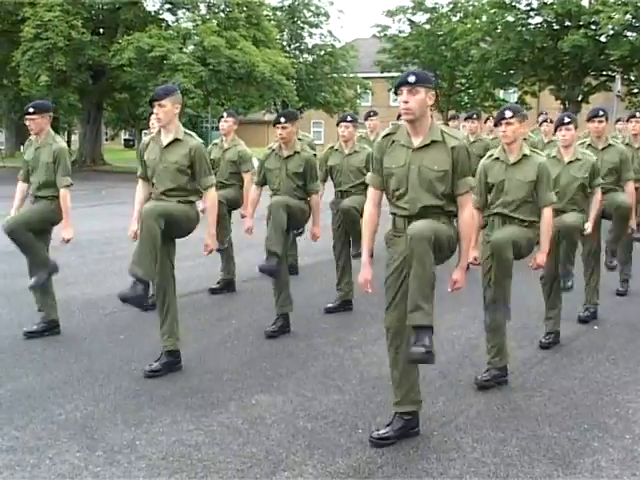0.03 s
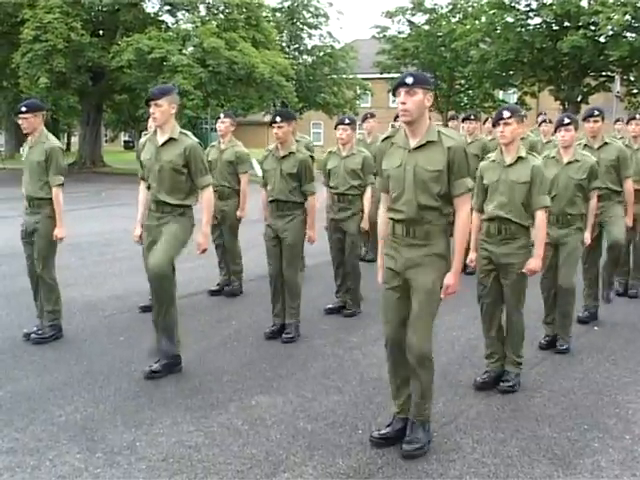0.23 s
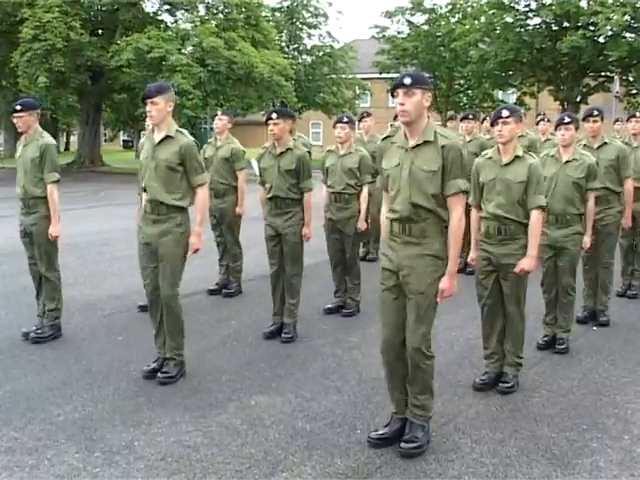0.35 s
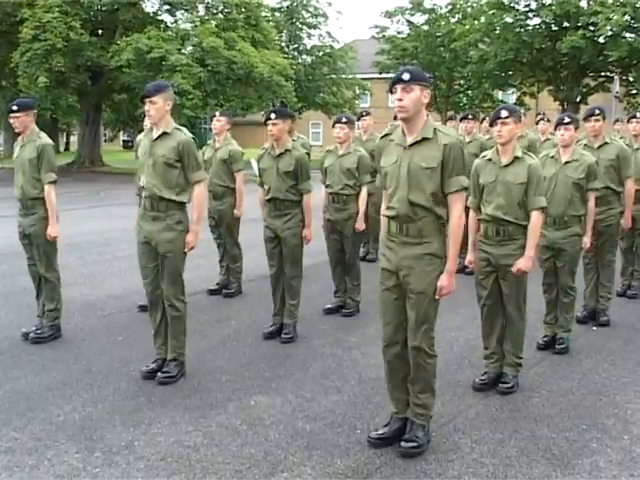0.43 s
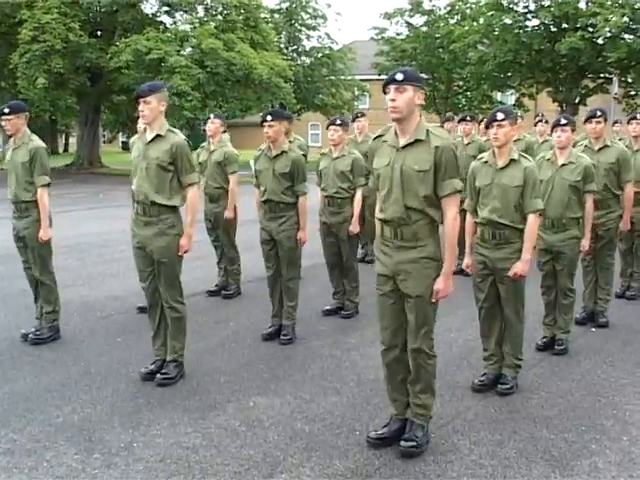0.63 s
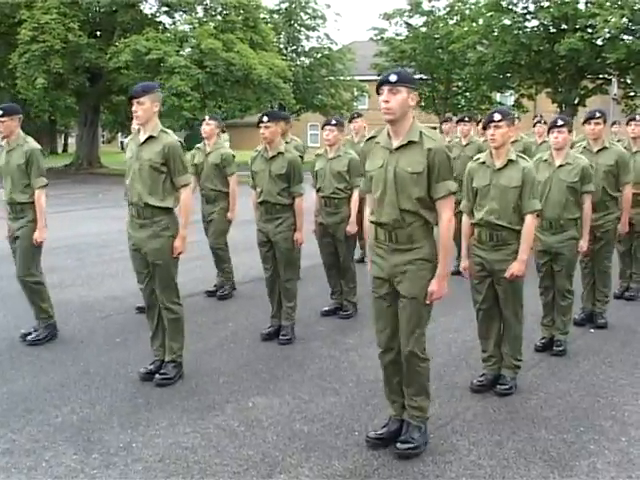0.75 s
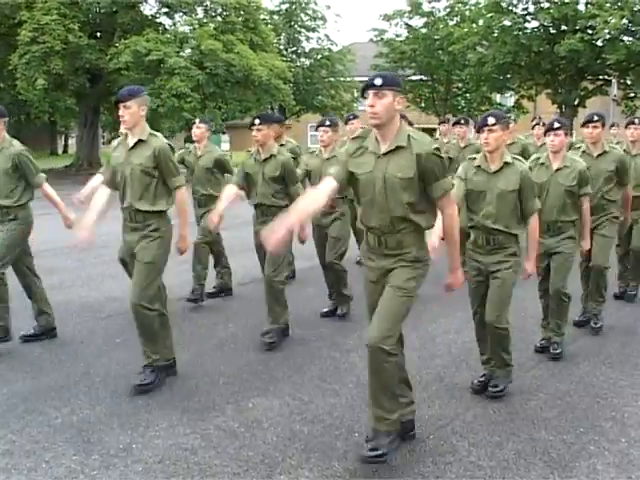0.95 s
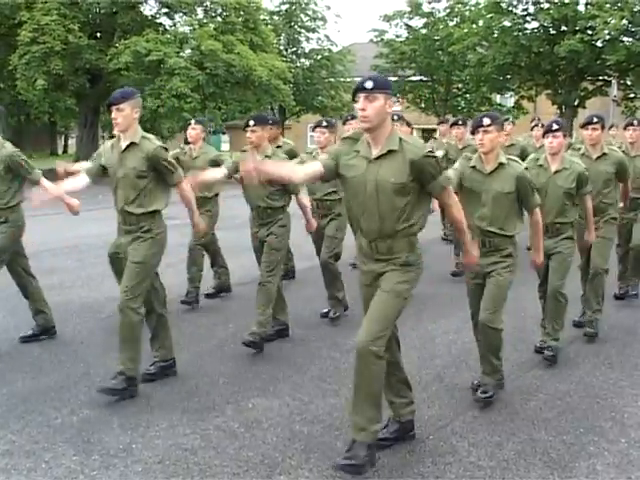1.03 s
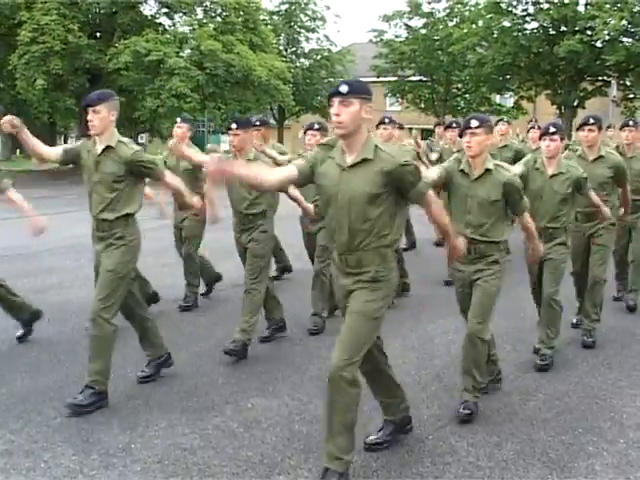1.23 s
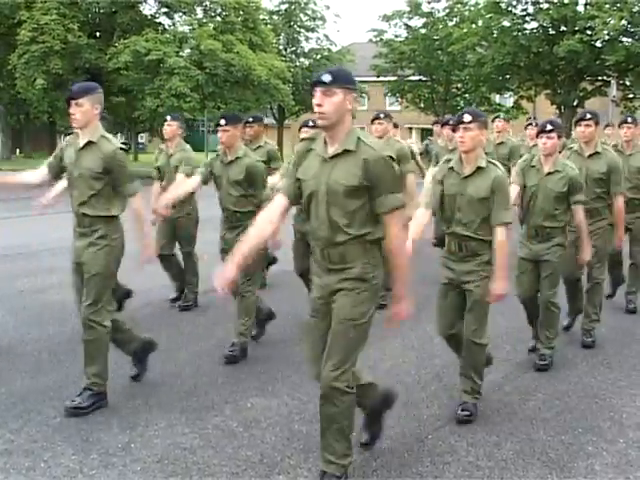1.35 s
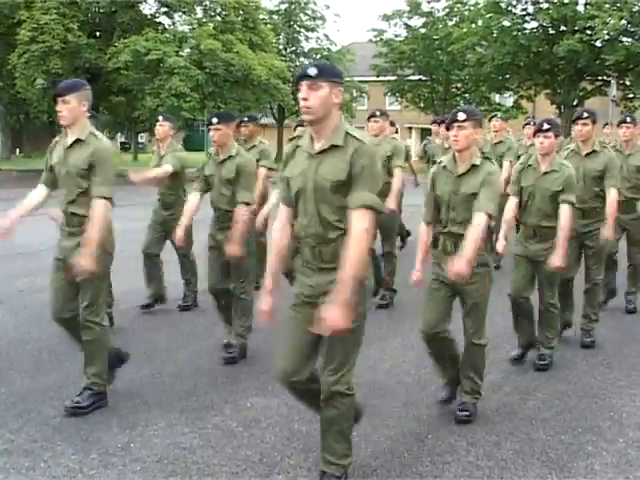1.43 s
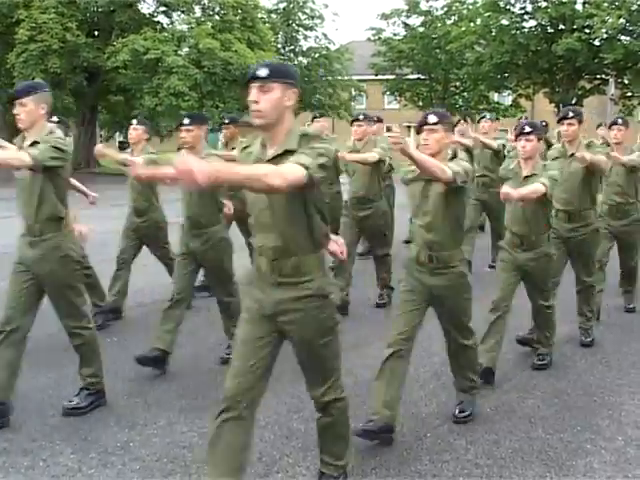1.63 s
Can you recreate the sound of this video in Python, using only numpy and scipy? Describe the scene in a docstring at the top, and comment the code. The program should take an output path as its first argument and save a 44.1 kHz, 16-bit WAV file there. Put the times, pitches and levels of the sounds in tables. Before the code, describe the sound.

A squad of soldiers stamps down almost together on an open square, a loud gritty clatter heard close by and louder on the left. They pause, then march off with faint steps, scuffs and uniform rustle over a light wind rumble.

```python
"""A squad of soldiers on an open tarmac square, heard from beside the front ranks, louder on the left.
Light wind rumbles on the microphone and uniforms rustle. The men stamp to attention in one ragged
volley, each boot a hollow clap with a crunch of grit; buildings and trees send back a dull echo.
They stand still for a moment, then march off with soft steps, scuffing soles and rustling cloth."""
import sys
import numpy as np
from scipy import signal
from scipy.fft import rfft, irfft
from scipy.io import wavfile

SR = 44100
rng = np.random.default_rng(int(sys.argv[2]) if len(sys.argv) > 2 else 0)


def master(y):
    """Save y as 16-bit WAV."""
    cut = np.clip(np.atleast_2d(y).T, -1, 1)
    pcm = np.round(cut * 32767)  # scale
    wavfile.write(sys.argv[1], SR, pcm.astype(np.int16))


N = 74970
TIME = np.arange(N) / SR
STAMP_CRUNCH_S, STEP_CRUNCH_S = 0.0017, 0.0018  # stamps and steps each give a brief crunch of grit


def amp(db):
    """Decibels to gain."""
    return 10 ** (np.asarray(db) / 20)


def unit(x):
    """Scales to rms 1."""
    return x / np.sqrt(np.mean(x ** 2) + 1e-20)


def read(points, hz):
    """Reads a table along a log-frequency axis."""
    f, value = np.transpose(points)
    return np.interp(np.log(hz + 1), np.log(f + 1), value)


def add(mix, start_s, sound):
    """Mixes a sound in at the given time."""
    part = mix[max(round(start_s * SR), 0):][:len(sound)]
    part += sound[:len(part)]


def butter(x, hz, kind, order=2):
    """Butterworth low-pass or high-pass."""
    return signal.sosfilt(signal.butter(order, hz, kind, fs=SR, output="sos"), x)


def resonate(x, hz, q):
    """Two passes through one resonance."""
    peak = signal.iirpeak(hz, q, SR)
    return signal.lfilter(*peak, signal.lfilter(*peak, x))


def colour(x, points, size=2048):
    """Causal filter of unit energy with the given spectrum."""
    log_gain = np.log(amp(read(points, abs(np.fft.fftfreq(size, 1 / SR)))))
    taps = np.fft.ifft(np.exp(np.conj(signal.hilbert(log_gain)))).real
    return signal.fftconvolve(x, taps / np.linalg.norm(taps))[:len(x)]


def wander(rate_hz):
    """Smooth random drift of rms 1, up to the given rate."""
    hz = np.fft.rfftfreq(N, 1 / SR)
    return unit(irfft(rfft(rng.standard_normal(N)) / (1 + (hz / rate_hz) ** 4), N))


def gravel(size, spread_db):
    """Dense tiny fractures of uneven size, rms 1."""
    return unit(rng.standard_normal(size) * amp(spread_db * np.minimum(rng.exponential(1, size), 3)))


def wind():
    """Light wind on the microphone: a lumpy low rumble with a trace of outdoor hiss."""
    # strength of the wind (time [s], level [dB])
    gusts = [(0, -44), (.06, -54), (.18, -54), (.55, -51), (0.679, -54.5), (.85, -51), (1.0, -53.5),
             (1.2, -48.5), (1.45, -55.5), (1.7, -53)]
    # spectrum of the rumble (frequency [Hz], level [dB])
    spectrum = [(20, -11), (52, -6), (90, 0), (135, 3), (200, -3.5), (400, -10), (800, -29.5),
                (2000, -27.5), (6000, -39.5), (16000, -57)]
    level = np.interp(TIME, *np.transpose(gusts))
    rumble = colour(rng.standard_normal(N), spectrum)
    return amp(level) * unit(rumble * amp(1.5 * wander(rate_hz=25)))


def uniforms():
    """Grainy friction of cloth, faintest while the men stand still."""
    # rustle as legs and arms swing (time [s], level [dB])
    rustle = [(0, -52.5), (.09, -56.5), (0.181, -58.5), (.45, -58), (0.599, -65.5), (.76, -68),
              (.84, -59.5), (.92, -55.5), (1.08, -57), (1.2, -58.5), (1.33, -59), (1.42, -55), (1.5, -54),
              (1.59, -53.5), (1.7, -56.5)]
    # spectrum of the cloth (frequency [Hz], level [dB])
    cloth = [(150, -2), (500, 8.5), (1000, 3), (2000, -3), (4000, -8.5), (7000, -14), (11000, -14),
             (13000, -17), (16000, -34)]
    level = np.interp(TIME, *np.transpose(rustle))
    rubbing = rng.standard_normal(N) * amp(wander(rate_hz=250))
    return amp(level) * unit(colour(rubbing, cloth))


def boots(rows, crunch_s):
    """Each sole claps the air out from under it, thuds, and crunches grit at a pitch of its own."""
    # spectrum of the broad part of the grit (frequency [Hz], level [dB])
    grit_spectrum = [(200, -34), (700, 28), (1400, 15), (2400, -1), (3600, 6.5), (5000, -14), (7000, -12),
                     (11000, -7), (13500, -18), (16000, -42)]
    grit_rise_s, settle_s = 0.00089, 0.014
    thud_hz, thud_s = 94.2, 0.0064  # the weight of the leg behind the sole
    peak_cycles, snap_cycles = 0.51, 0.34
    blows, broad_grit = np.zeros((2, N))
    t = np.arange(SR // 12) / SR
    crunch = (1 - np.exp(-t / grit_rise_s)) * (np.exp(-t / crunch_s) + amp(-28) * np.exp(-t / settle_s))
    thud = amp(-20.5) * t / thud_s * np.exp(1 - t / thud_s) * np.sin(2 * np.pi * thud_hz * t)
    for start, clap_db, clap_hz, grit_db, grit_hz in rows:
        cycles = t * clap_hz
        # the clap starts sharp and sinks as the sole closes on the ground
        turns = 0.67 * cycles + 0.46 * (1 - np.exp(-cycles / snap_cycles))
        swell = cycles / peak_cycles
        clap = (swell * np.exp(1 - swell)) ** 2.18 * np.sin(2 * np.pi * turns)
        add(blows, start, amp(clap_db) * (thud - clap))
        grains = gravel(len(t), spread_db=3.5)
        add(blows, start, amp(grit_db) * crunch * unit(resonate(grains, grit_hz, q=2.11)))
        add(broad_grit, start, amp(grit_db - 1.5) * crunch * grains)
    return butter(blows + colour(broad_grit, grit_spectrum), 117.4, "high")


def steps():
    """Soft footfalls crunch briefly on the grit: one before the volley, the rest as the men march off."""
    # footfalls (time [s], clap level [dB], nominal clap pitch [Hz], grit level [dB], grit pitch [Hz])
    footfalls = [(.0410, -35.5, 710, -55, 754), (.9025, -36, 213, -40.5, 1950),
                 (1.0055, -55, 397, -40.5, 1590), (1.1625, -33.5, 170, -55, 2960),
                 (1.1700, -36, 222, -50, 3700), (1.2260, -37.5, 314, -47, 4050),
                 (1.2342, -33, 344, -42.5, 2140), (1.2515, -31, 223, -59, 2500),
                 (1.2590, -39.5, 340, -74, 2500), (1.2672, -38, 270, -66, 2500),
                 (1.2862, -29, 236, -67, 900), (1.2930, -32, 286, -70, 3000), (1.4085, -38, 108, -70, 3130)]
    return boots(footfalls, STEP_CRUNCH_S)


def front_ranks():
    """The boots nearest the microphone stamp down in a ragged volley."""
    # stamps (time [s], clap level [dB], nominal clap pitch [Hz], grit level [dB], grit pitch [Hz])
    stamps = [(.2157, -14, 306, -36, 1480), (.2366, -10.5, 354, -25, 1380), (.2402, -12.5, 247, -21.5, 860),
              (.2560, -33, 177, -33, 2250), (.2670, -10, 340, -23.5, 2270), (.2762, -17.5, 335, -34, 3600),
              (.2825, -17.5, 378, -47, 1730), (.2915, -15, 320, -54, 4080), (.2991, -7, 598, -30, 1870),
              (.3009, -6.5, 335, -19.5, 880), (.3079, -4, 212, -25, 1580), (.3128, -9, 265, -28, 2600),
              (.3225, -14.5, 417, -48, 2060), (.3337, -15.5, 444, -48, 3800),
              (.3395, -12.5, 231, -30, 1470), (.3466, -8, 438, -29.5, 2150), (.3522, -12, 149, -49, 2760),
              (.3625, -14.5, 706, -19.5, 1330), (.3674, -15, 290, -49, 2420),
              (.3721, -11.5, 373, -29.5, 1660), (.3745, -14, 215, -32.5, 3400),
              (.3838, -17, 211, -39.5, 3450), (.3893, -20.5, 226, -33, 3620), (.4177, -24, 348, -40, 2330),
              (.4258, -20.5, 310, -29, 1600), (.4332, -24, 189, -58, 3000), (.4430, -30, 250, -55, 2320),
              (.4494, -20, 222, -63, 3000), (.4632, -22, 396, -36.5, 1880), (.4760, -42, 414, -44.5, 2670),
              (.4870, -33.5, 487, -44, 3400)]
    return boots(stamps, STAMP_CRUNCH_S)


def heel_cracks():
    """Hard heel edges crack against stones in the tarmac: a brief rattle of fracture, rung by the stone."""
    # heel strikes (time [s], level [dB], pitch [Hz])
    strikes = [(0.216, -45.5, 9000), (0.226, -37, 3020), (0.236, -44.5, 5950), (.2670, -23, 2020),
               (0.298, -33, 4030), (0.3477, -32.5, 5270), (0.3807, -53, 7000), (.4258, -27, 2030),
               (0.4443, -37.5, 3500), (0.5004, -36.5, 3080), (0.5718, -53, 4030), (.8880, -44, 4400),
               (1.2863, -43, 806)]
    decay_s = 0.0009
    out, t = np.zeros(N), np.arange(SR // 60) / SR
    for start, db, hz in strikes:
        rattle = rng.standard_normal(len(t)) * np.exp(-t / decay_s)
        top_hz = min(2.03 * hz, SR / 3)  # above this a stone radiates little
        ring = butter(resonate(rattle, hz, q=0.73), top_hz, "low", order=4)
        add(out, start, amp(db) * ring / abs(ring).max())
    return out


def grinding():
    """All the soles grind loose grit, joining the separate blows into one crunch that trails off."""
    # grit ground under the whole squad (time [s], level [dB])
    grind = [(.22, -58), (.265, -45), (.31, -41.5), (.38, -47.5), (.42, -52), (.48, -54.5), (.52, -60.5),
             (.58, -84)]
    # spectrum of the crunch (frequency [Hz], level [dB])
    spectrum = [(300, -10), (1300, 7.5), (2500, 1), (4300, -3), (6000, -8), (7500, -14), (11000, -15.5),
                (16000, -27)]
    level = np.interp(TIME, *np.transpose(grind), left=-120, right=-120)
    clumps = gravel(N, spread_db=4.5) * amp(3.5 * wander(rate_hz=220))
    return amp(level) * unit(colour(clumps, spectrum))


def rear_ranks(count=90):
    """Boots farther from the microphone land at random, filling the volley and trailing behind it."""
    # strength of the far stamps (time [s], level [dB])
    volley = [(.222, -26), (.27, -27), (.31, -20.5), (0.369, -18), (0.406, -32), (0.462, -28.5),
              (0.484, -43.5), (.56, -43)]
    when, level = np.transpose(volley)
    slot = (np.arange(count) + rng.random(count)) / count
    start = when[0] + slot * (when[-1] - when[0])
    force, pitch, grit, stone = rng.standard_normal((count, 4)).T
    clap_db, clap_hz = np.interp(start, when, level) + 2 * force, 388 * 2 ** (0.57 * pitch)
    grit_db, grit_hz = clap_db - 19.5 + 3 * grit, 2240 * 2 ** (stone / 3)
    stamps = boots(zip(start, clap_db, clap_hz, grit_db, grit_hz), STAMP_CRUNCH_S)
    return butter(stamps, 7000, "low")  # the front ranks shade the treble


def air_puff(at_s=0.33, width_s=0.028, hz=21.8):
    """One slow push of air from the nearest boot reaches the microphone with the heaviest stamp."""
    t = TIME - at_s
    return amp(-35) * np.exp(-(t / width_s) ** 2) * np.sin(2 * np.pi * hz * t)


def scuffs(sag_octaves=0.25, width_share=0.59):
    """A sole drags over the tarmac; its rasp swells, fades and sinks in pitch as it slows."""
    # drags (time [s], length [s], level [dB], pitch [Hz])
    drags = [(0.524, 0.0094, -56, 3330), (0.874, 0.011, -61, 4830), (.924, .026, -55.5, 3460),
             (0.95, 0.022, -59.5, 1848), (1.17, 0.021, -58, 3740), (1.308, 0.016, -62.5, 4000),
             (1.483, 0.015, -54.5, 1470)]
    out = np.zeros(N)
    for start, length, db, hz in drags:
        t = np.arange(0, length, 1 / SR)
        progress = t / t[-1]
        glide_hz = hz * 2 ** (sag_octaves * (.5 - progress))
        carrier = np.exp(2j * np.pi * np.cumsum(glide_hz) / SR)
        grains = gravel(SR // 8, spread_db=5)[:len(t)]
        # keep a band of the grains that follows the glide
        rasp = (carrier * butter(grains / carrier, width_share * hz / 2, "low")).real
        add(out, start, amp(db) * np.sin(np.pi * progress) * unit(rasp))
    return out


def body_scatter(x, peak_s=0.015):
    """The men's bodies scatter the upper part of each blow and thicken it into a clatter."""
    t = np.arange(SR // 12) / SR
    reflections = butter(rng.standard_normal(len(t)) * t * np.exp(-t / peak_s), 493, "high")
    return signal.fftconvolve(x, amp(-12.5) * reflections / np.linalg.norm(reflections))[:N]


def square_echo(x, rise_s=0.071, echo_s=0.38, spread_s=0.12):
    """A thin tail from the open square, then a smeared dull echo from distant buildings and trees."""
    # reverberation of the square (frequency [Hz], time to fall 60 dB [s])
    decay_times = [(100, 0.39), (400, 0.44), (2000, 0.38), (8000, 0.42)]
    # spectrum of the echo (frequency [Hz], level [dB])
    echo_spectrum = [(60, -33), (130, -7), (260, -1.5), (450, -2), (900, -2), (2500, -1.5), (8000, -31)]
    t = np.arange(SR) / SR
    hz, age, bands = signal.stft(rng.standard_normal(SR), SR, nperseg=256)
    decay = amp(-60 * age / read(decay_times, hz)[:, None])
    tail = signal.istft(bands * decay, SR, nperseg=256)[1][:SR] * (1 - np.exp(-t / rise_s))
    scatter = rng.standard_normal(SR) * np.exp(-((t - echo_s) / spread_s) ** 2 / 2)
    dulling = amp(read(echo_spectrum, np.fft.rfftfreq(SR, 1 / SR)))
    echo = irfft(rfft(scatter / np.linalg.norm(scatter)) * dulling, SR)
    return signal.fftconvolve(x, amp(-20) * tail / np.linalg.norm(tail) + amp(-26) * echo)[:N]


def scene():
    """All sources at one microphone on the square, stronger in the left channel."""
    balance_db = 9
    feet = rear_ranks() + front_ranks() + steps() + heel_cracks() + grinding() + scuffs()
    mono = feet + body_scatter(feet) + square_echo(feet) + air_puff() + uniforms() + wind()
    sides = amp([[balance_db / 2], [-balance_db / 2]])
    return mono * sides / sides.mean()


def record(dry):
    """The recorder cuts the treble above 15750 Hz."""
    band_limit = signal.firwin(511, 15750, window=("kaiser", 9), fs=SR)
    return signal.oaconvolve(dry, band_limit[None], "same")


dry = scene()
out = record(dry)
master(out)
```